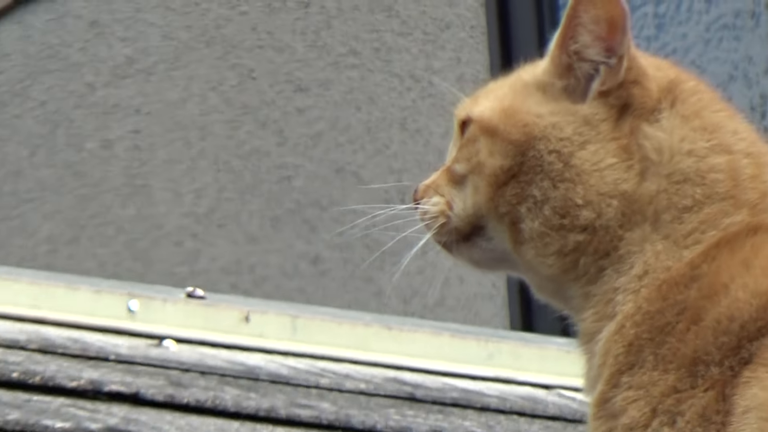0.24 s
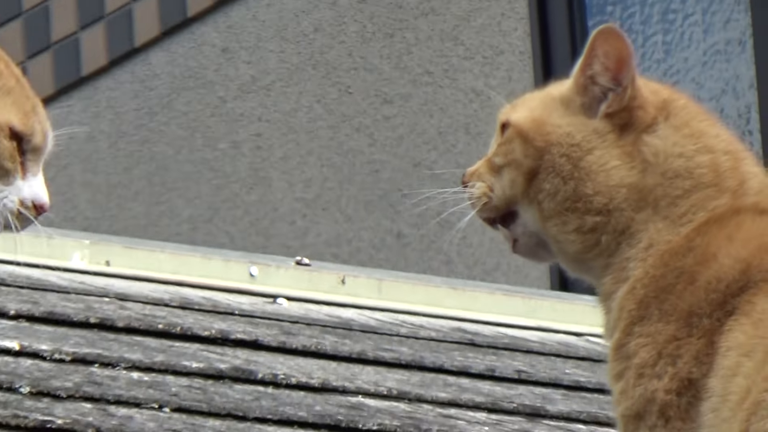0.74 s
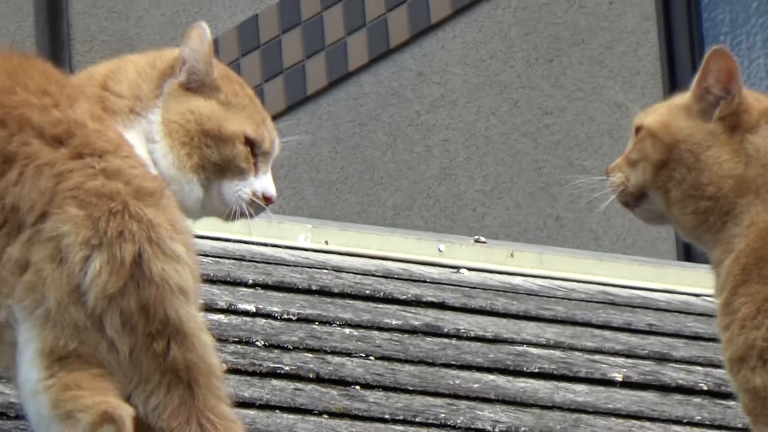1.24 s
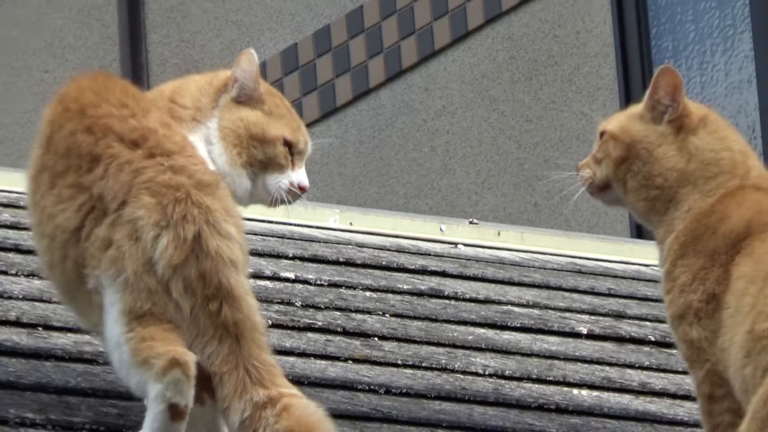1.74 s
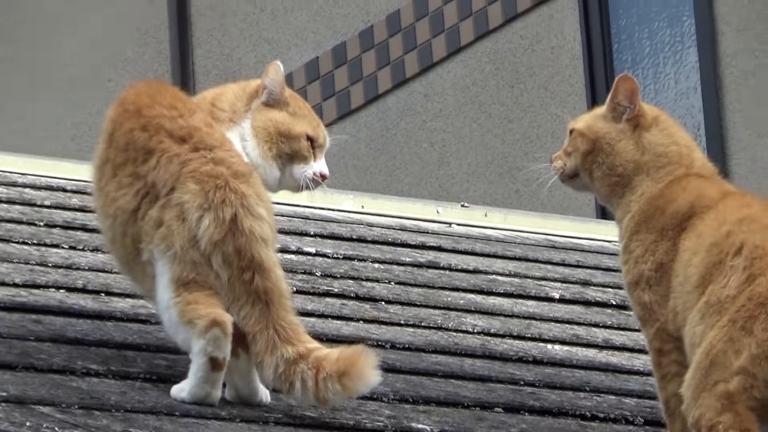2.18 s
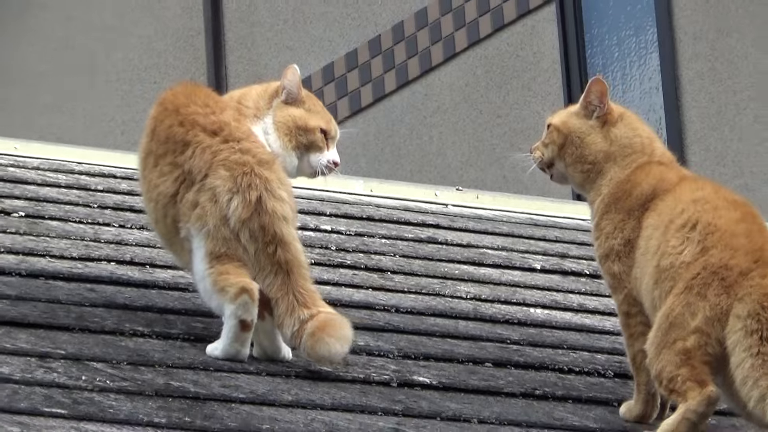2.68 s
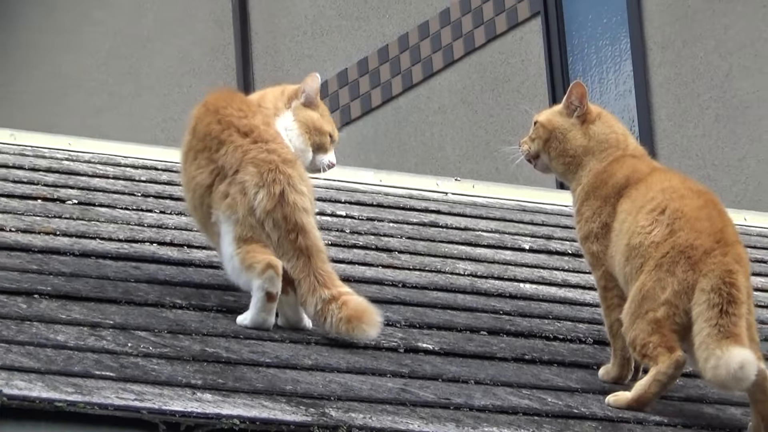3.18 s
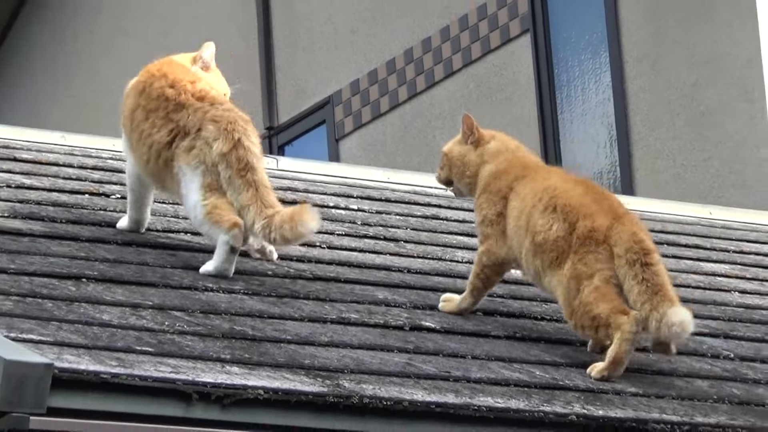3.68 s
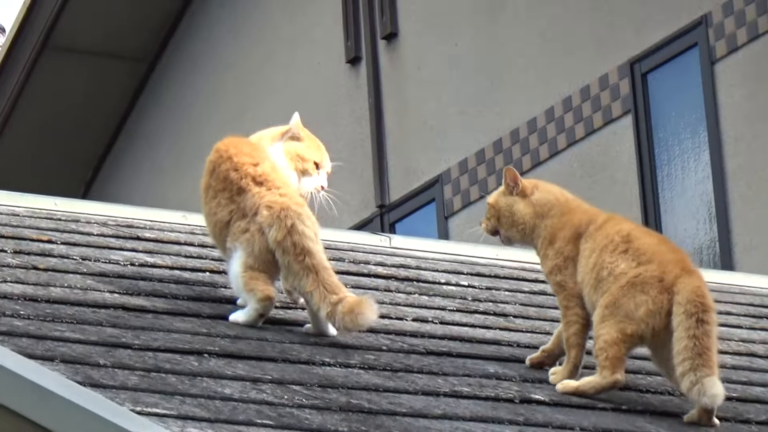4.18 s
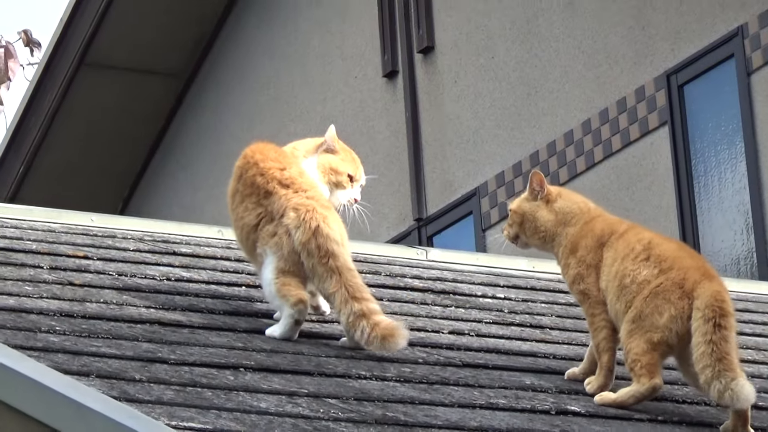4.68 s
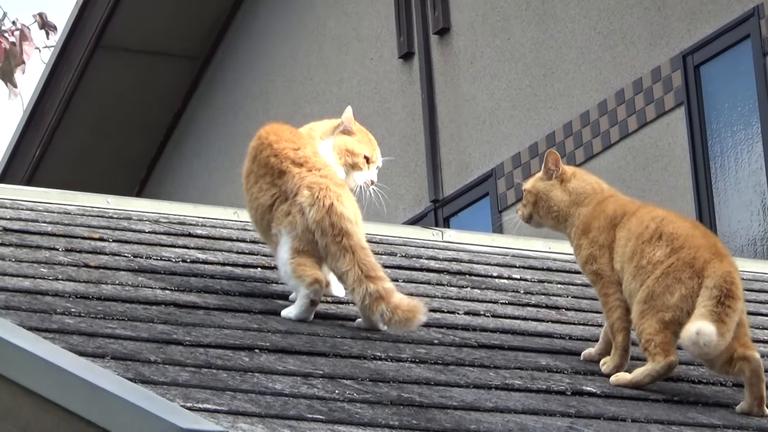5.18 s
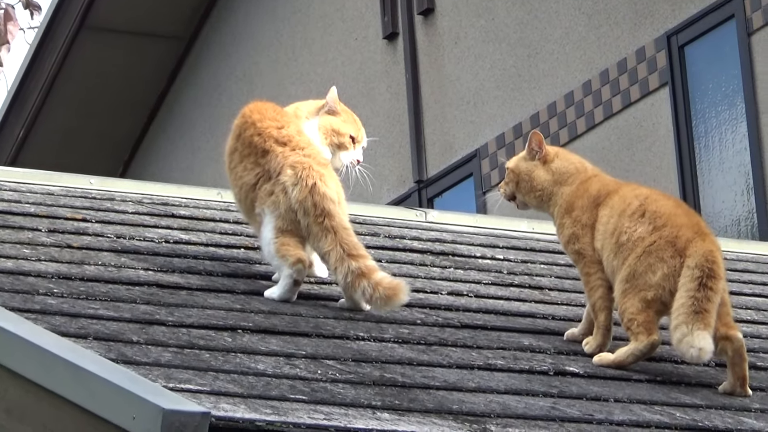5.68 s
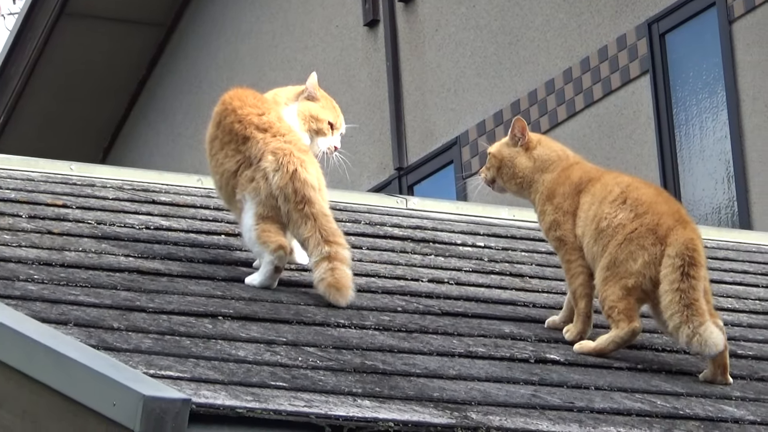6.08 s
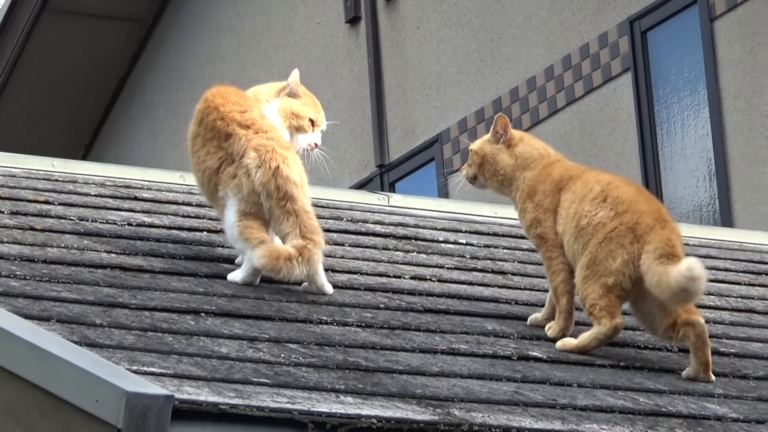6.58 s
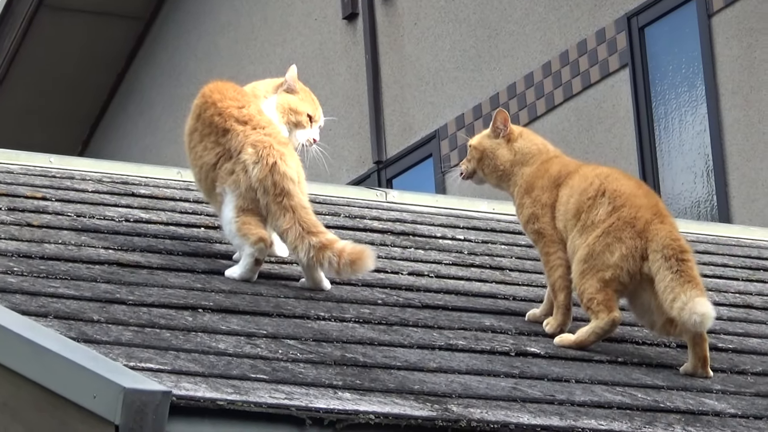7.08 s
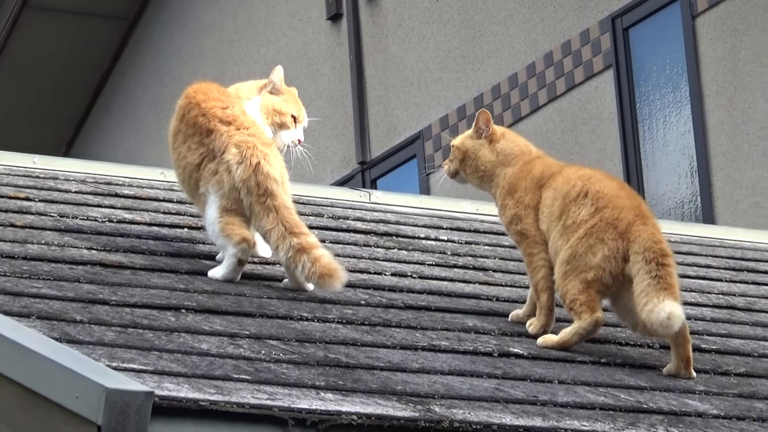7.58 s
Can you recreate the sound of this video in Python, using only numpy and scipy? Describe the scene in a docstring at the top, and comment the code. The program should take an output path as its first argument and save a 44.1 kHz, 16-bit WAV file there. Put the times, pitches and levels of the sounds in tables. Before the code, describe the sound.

Two tomcats face off on a roof beside a house wall, with soft outdoor air and distant traffic rumble throughout. A very thin, high camera motor whine runs until about 3.5 seconds, and a close click with light scuffs comes at 0.1. From 0.6 to 1.4 a nasal, ringing yowl arches up and sinks, leaving a faint falling moan near 1.5. A short double hooting bark, likely a dog's, echoes at 2.1. A shorter yowl fills 2.8 to 3.3, followed by small clicks and one bark at 3.7. The longest yowl scoops up sharply at 3.7 and slowly falls, hoarse at its edges, until 4.8. Traffic and air swell around 5. The last yowl, 5.7 to 6.7, breaks upward into a thinner tone, with a soft mouth click after it. More barks come at 7.1 and in a quick cluster from 7.5, mostly right. Walls return short echoes.

```python
"""A roof beside a house wall: distant traffic and outdoor air are shaped noise that swells, most from about 5 s.
A camera's zoom motor whines faintly until 3.55 s, a wavering sine; noise bursts on resonances click close by.
From 0.6 s two tomcats face off in four arching, nasal yowls, harmonic stacks thrown back by the walls.
From 2.1 s short hooting barks, likely a dog's, come from a nearby yard: arched tones with gruff noise and echo."""
import sys
import numpy as np
from scipy import signal
from scipy.fft import rfft, irfft, next_fast_len
from scipy.io import wavfile

SR = 44100
rng = np.random.default_rng(int(sys.argv[2]) if len(sys.argv) > 2 else 0)


def waveform_to_disk(signal):
    """Save audio, clipped to [-1, 1], as 16-bit WAV at the path in sys.argv[1]."""
    frames = np.transpose(np.atleast_2d(signal))
    scaled = np.clip(frames, -1, 1) * 32767
    samples = np.round(scaled).astype(np.int16)
    wavfile.write(sys.argv[1], SR, samples)


N = 345744
T = np.arange(N) / SR  # s

# outdoor air, spectrum: [f/Hz, level/dB]
AIR_COLOUR = [(15, -43), (25, -14.5), (87, -11.5), (117, 0.5), (166, -6), (200, -23.5), (235, -0.5),
              (502, -12.5), (694, -11), (1070, -14.5), (1830, -25.5), (3700, -29.5), (12500, -38.5),
              (13900, -47), (15900, -40)]
# background swells: [t/s, middle level/dB, hiss level/dB], both over the air
BACKGROUND_SWELL = [(0, 1.5, 2.5), (1.8, 2, 2.5), (3.5, 2, 4), (4.9, 5, 7.5), (5.25, 10, 6.5), (5.55, 5, 7),
                    (6.9, 6.5, 6), (7.84, 4.5, 5)]
# far engines and tyres, spectra: [f/Hz, level/dB]
ENGINE_COLOUR = [(40, -25), (80, -2.5), (120, -0.5), (145, 0.5), (174, 5.5), (200, -4), (260, -18),
                 (500, -59.5)]
TYRE_COLOUR = [(150, -22.5), (205, -5.5), (240, 3), (285, -5.5), (350, -10), (550, -23.5), (1200, -46.5)]
# traffic swells: [t/s of the peak, half length/s, engine level/dB, tyre level/dB]
TRAFFIC_SWELLS = [(4.9, 0.44, -54, -53.5), (6.05, 0.17, -69, -54.5), (6.75, 0.78, -50.5, -60),
                  (7.47, 0.31, -47.5, -54.5), (7.83, 0.14, -64, -50)]
# zoom motor whine: [f/Hz, level/dB]
ZOOM_WHINE = [(13706, -87)]
# clicks and short scuffs; the two near 6.75 s are likely the cat's mouth closing:
# [t/s, peak level/dB, decay/s, treble tilt/(dB per octave)]
CLICKS = [(0.125, -31.5, 0.028, 14), (0.1322, -16, 0.0036, -2), (.146, -32, 0.0027, -6),
          (.16, -35, 0.017, -11.5), (3.282, -39, 0.034, -2), (3.298, -40, 0.019, 11),
          (3.4698, -45, 0.015, 8), (3.5327, -34, 0.0037, 5), (3.675, -30.5, 0.0073, -6),
          (6.748, -35, 0.019, -15), (6.795, -45, 0.017, 16), (7.6239, -47, 0.0037, 21)]
# what the clicks ring with: [f/Hz, width/Hz, level/dB]
CLICK_MODES = [(780, 400, -8), (1320, 410, 1), (1990, 210, 1), (3590, 81, 1), (5060, 180, -10),
               (7250, 240, -25)]
# noise of the clicks, spectrum: [f/Hz, level/dB]
CLICK_COLOUR = [(250, -21), (620, -15.5), (850, -3), (1330, 3), (1750, -10), (2150, -2.5), (3300, -7),
                (4300, -11), (5050, -11.5), (6000, -20.5), (9400, -22), (15500, -56)]

# pitch arch of each yowl; the fourth breaks upward into a thinner register: [t/s, f/Hz]
PITCH_1 = [(.645, 577), (.675, 619), (.729, 654.4), (.809, 674.2), (.971, 684.4), (1.155, 685.2),
           (1.225, 667.4), (1.287, 627.8), (1.4, 602)]
PITCH_2 = [(2.772, 670), (2.87, 699), (2.95, 695.7), (3.01, 689.2), (3.12, 683.8), (3.185, 676),
           (3.28, 636)]
PITCH_3 = [(3.68, 377), (3.732, 599), (3.764, 679), (3.815, 744), (3.874, 768.4), (4.0, 780.5),
           (4.22, 761.6), (4.42, 711.3), (4.62, 685.8), (4.716, 651.3), (4.8, 582)]
PITCH_4 = [(5.66, 588.4), (5.732, 633.4), (5.79, 651.6), (5.92, 657.8), (6.01, 643.1), (6.03, 653)]
PITCH_4_BREAK = [(6.045, 664), (6.09, 675), (6.25, 666.7), (6.42, 649.5), (6.53, 625.8), (6.645, 586),
                 (6.7, 612.3), (6.74, 591.5)]
# how each is pushed out: [t/s, effort level/dB, mouth opening/0-1, nasal level at 3-5 kHz/dB,
# level of the overtones above it/dB]
EFFORT_1 = [(.645, -38, 0.35, -71, -72), (0.738, -28.5, 0.29, -53.5, -57.5), (.9, -30, 0.31, -43, -49.5),
            (1.03, -28, 0.39, -46.5, -51.5), (1.14, -31.5, 0.34, -54, -52.5), (1.27, -27, 0.19, -56, -59.5),
            (1.399, -44.5, 0.24, -67, -76)]
EFFORT_2 = [(2.77, -35.5, .27, -60, -74), (2.87, -32, 0.29, -56, -62.5), (3.07, -29, 0.27, -54.5, -57.5),
            (3.19, -29, 0.22, -56.5, -53.5), (3.28, -34.5, 0.2, -56, -63.5)]
EFFORT_3 = [(3.68, -39, 0.66, -63, -66), (3.733, -21.5, 0.64, -54, -53), (3.84, -23, 0.59, -47, -50.5),
            (3.97, -24.5, 0.55, -44, -45), (4.1, -25.5, 0.47, -39.5, -47.5), (4.18, -26.5, .44, -44, -44),
            (4.24, -21.5, 0.48, -41, -46.5), (4.45, -24, 0.33, -48, -45.5), (4.62, -22, 0.27, -50, -48),
            (4.78, -22, 0.25, -58, -49.5), (4.83, -40.5, 0.26, -66, -66)]
EFFORT_4 = [(5.66, -30.5, 0.44, -74, -72), (5.71, -24, 0.43, -59, -58.5), (5.9, -19.5, 0.25, -50, -49.5),
            (6.03, -16.5, 0.11, -52, -50.5)]
EFFORT_4_BREAK = [(6.045, -28, .02, -63, -55.5), (6.2, -29.5, .02, -60.5, -55.5),
                  (6.299, -24.5, 0.032, -56, -57.5), (6.35, -23, .06, -58.5, -59),
                  (6.5, -27.5, .12, -48, -61), (6.59, -20, 0.14, -56, -56), (6.66, -27, 0.23, -57, -57.5),
                  (6.74, -36, 0.15, -64, -78)]
# throat colour above the fourth harmonic: [f/Hz, level/dB]
THROAT_1 = [(2900, -18), (3400, -7.5), (4120, 0.5), (4800, -8), (5500, -7.5), (6200, -5), (6850, -20),
            (7500, -13), (8200, -8), (8900, -1.5), (9600, -11.5), (11000, -28), (12400, -15), (14500, -40)]
THROAT_2 = [(1880, -25), (3200, -29), (3510, 11), (3760, -16), (4150, 4), (4840, 2), (5120, -14), (5510, 3),
            (5790, -31), (6120, -8), (9670, 0), (10900, -60), (14000, -32)]
THROAT_3 = [(1800, -1), (2300, 3), (2800, 13.5), (3200, -2), (3900, -16.5), (4300, 0), (4680, -0.5),
            (5100, -9), (5450, -3.5), (6200, -1.5), (7000, -2.5), (8400, -5), (9400, -4.5), (10100, -12),
            (11000, -7), (12600, -17), (15000, -31)]
THROAT_4 = [(2900, -9), (3300, 2.5), (3950, 3.5), (4600, -4), (5250, -10), (6000, -8.5), (7200, -1.5),
            (8000, 1.5), (9200, -7), (10500, -11), (12000, -14), (14000, -36)]
THROAT_4_BREAK = [(3400, -9.5), (4050, -13), (4500, 6), (4750, -4), (5400, -10.5), (6100, -11), (6800, -8),
                  (7400, -2.5), (8100, -13), (10000, -12), (12000, -45), (14000, -32)]
# one row for each yowl and register: [attack/s, release/s, fundamental level at the usual pitch/dB,
# centre of the ring lifting the fourth harmonic f/Hz, ring level over the overtones/dB,
# hoarseness throughout/0-1, extra hoarseness at the start, extra at the end]
VOICES = [(.015, 0.016, -46, 2846, 19, 0.054, 0.031, .08),
          (0.0022, 0.0076, -45.5, 2570, 14.9, 0.069, .02, .16),
          (.022, 0.045, -38.5, 2734, 15.6, 0.047, 0.36, 0.17),
          (0.012, 0.01, -40, 2780, 14.7, 0.019, 0.031, .02),
          (.012, 0.0046, -40.5, 2330, 16.3, 0.034, .04, 0.065)]
# wall echoes: [delay t/s, left level/dB, right level/dB]
WALLS = [(.0113, -26.5, -19.5), (.029, -25, -36.5), (.056, -15, -15), (.088, -17, -32.5)]
# barks, each in one to four pushes: [t/s, length/s, pitch f/Hz, level/dB, roughness/0-1, left minus right/dB]
BARKS = [(2.095, 0.083, 877.4, -29, 0.35, -4.5), (2.156, 0.059, 862.4, -27.5, 0.35, -1),
         (3.697, 0.065, 879, -22, 0, -5), (7.13, 0.064, 866.6, -29, 0.24, -4.5),
         (7.167, 0.0625, 880.3, -20.5, 0.16, -5.5), (7.456, 0.039, 765, -35.5, 0.44, 2),
         (7.5, 0.0565, 825.6, -25, 0.31, -5), (7.562, 0.028, 827, -29.5, 0.36, -4),
         (7.61, 0.04, 863, -30, 0, -1)]

AIR_DB, ENGINES_DB, TYRES_DB = -52.5, -58.5, -60.5  # air before its bands are split; steady traffic
# the fundamental carries better as the pitch rises above its usual value
USUAL_HZ, FUNDAMENTAL_DB_PER_OCTAVE = 649, 26
MOUTH_WIDTH = 0.16  # half width of the mouth resonance, as a share of the pitch
RING_WIDTH_HZ = 620
HOARSE_START_S, HOARSE_END_S = 0.16, 0.056
MOUTH_AIR_DB = -32.5  # turbulence in the half-open mouth, against the effort
HOARSE_AIR_DB = 19  # extra turbulence at hoarseness 1
TOP_HZ = 15800


def undb(db):
    """Decibels to gain."""
    return 10 ** (np.asarray(db) / 20)


def unit(x):
    """Scale to rms 1."""
    return x / np.sqrt(np.mean(x ** 2) + 1e-20)


def curves(table, t):
    """The columns of a table at times t."""
    s, *columns = np.transpose(table)
    return [np.interp(t, s, c) for c in columns]


def gain_at(points, hz):
    """Gain of an [f/Hz, level/dB] spectrum, read on a log frequency scale."""
    f, db = np.transpose(points)
    return undb(np.interp(np.log(hz + 1e-3), np.log(f), db))


def colour(x, points):
    """Filter by an [f/Hz, level/dB] spectrum."""
    size = x.shape[-1]
    padded = next_fast_len(size)
    gain = gain_at(points, np.fft.rfftfreq(padded, 1 / SR))
    return irfft(rfft(x, padded) * gain, padded)[..., :size]


def band(x, hz, width_hz):
    """One resonance, gain 1 at its centre."""
    b, a = signal.iirpeak(min(hz, .45 * SR), hz / width_hz, fs=SR)
    return signal.lfilter(b, a, x)


def wander(t, rate):
    """Random drift with about `rate` turns a second, spread near 1."""
    steps = (t - t[0]) * rate
    return 1.425 * np.interp(steps, np.arange(8192), rng.standard_normal(8192))


def reverb(x, t60, damp_hz, build_s):
    """Diffuse stereo tail between the houses; it builds up, then dies, treble first."""
    t = T[:SR]
    mid, side = rng.standard_normal((2, SR))
    tail = (mid + .5 * np.array([side, -side])) * (1 - np.exp(-t / build_s))
    lowpass = signal.butter(2, min(damp_hz, .45 * SR), fs=SR, output="sos")
    dull = signal.sosfilt(lowpass, tail)
    fade = np.exp(-np.log(1000) * t / t60)
    response = dull * fade + 0.13 * tail * fade ** 2
    return signal.fftconvolve(x[None], unit(response) / np.sqrt(SR), axes=1)[:, :N]


def add(track, start_s, sound):
    """Mix a sound in at its time."""
    i = max(int(start_s * SR), 0)
    track[..., i:i + sound.shape[-1]] += sound[..., :N - i]


def traffic_gains():
    """Gains of engines and tyres: the steady rumble and its bell-shaped swells add in power."""
    power = undb([[ENGINES_DB], [TYRES_DB]]) ** 2
    for s, half_s, engine_db, tyre_db in TRAFFIC_SWELLS:
        bell = np.exp(-((T - s) / half_s) ** 2)
        power = power + undb([[engine_db], [tyre_db]]) ** 2 * bell
    return np.sqrt(power)


def outdoors():
    """Outdoor air and distant traffic as shaped noise, nearly alike left and right, rising in swells."""
    middle_db, hiss_db = curves(BACKGROUND_SWELL, T)
    engine_gain, tyre_gain = traffic_gains()
    mid, side, engine, road = rng.standard_normal((4, N))
    side = colour(side, [(100, -40.5), (300, -18.5), (1200, -6), (4000, -5.0), (12000, -16.0)])
    spread = np.array([side, -side])
    air = undb(AIR_DB) * unit(colour(mid + spread, AIR_COLOUR))
    middle = colour(air, [(200, -16), (450, -2.5), (750, -3.5), (1250, -0.5), (1900, -4.5),
                          (3000, -6), (6000, -39.0)])
    hiss = colour(air, [(1000, -23), (1900, -3.0), (3000, -2.0), (6000, 3.5)])
    bass = colour(air, [(45, 1.0), (120, -34), (300, -35)])
    middle = middle * undb(middle_db + 1.13 * wander(T, 7.7))
    hiss = hiss * undb(hiss_db)
    engines = unit(colour(engine + spread, ENGINE_COLOUR)) * engine_gain
    tyres = unit(colour(road + spread, TYRE_COLOUR)) * tyre_gain
    return bass + middle + hiss + engines + tyres


def zoom_motor(stop_s=3.55):
    """A thin whine while the lens pulls back: one sine, slightly unsteady in pitch."""
    hz, db = ZOOM_WHINE[0]
    phase = 2 * np.pi * np.cumsum(hz + 25 * wander(T, 120)) / SR
    running = np.clip((stop_s - T) / 0.055, 0, 1)
    return np.sqrt(2) * undb(db) * np.sin(phase) * running


def clicks(rise=0.1):
    """Small clicks and short scuffs, noise bursts with a short echo; longer ones start more softly."""
    dry, t = np.zeros(N), T[:4096]
    lead = 128  # samples of silence ahead of each push
    for s, db, decay, tilt_db in CLICKS:
        envelope = np.exp(-t / decay) * (1 - np.exp(-t / (rise * decay)))
        push = np.pad(rng.standard_normal(len(t)) * envelope, (lead, 0))
        ring = sum(undb(mode_db) * band(push, hz, width) for hz, width, mode_db in CLICK_MODES)
        sound = unit(colour(push, CLICK_COLOUR)) + .5 * unit(ring)
        sound = colour(sound, [(500, 0), (8000, 4 * tilt_db)])  # four octaves of tilt
        sound = colour(sound, [(9500, -4), (12500, -8), (15500, -20)])
        add(dry, s - lead / SR, undb(db) * sound / np.abs(sound).max())
    return dry + undb(-11) * reverb(dry, t60=0.44, damp_hz=5400, build_s=0.0014)


def hoarseness(t, start, end, at_start, at_end):
    """The folds run unevenly while they get going and again as the air runs out."""
    getting_going = at_start * np.exp(-((t - start) / HOARSE_START_S) ** 2)
    running_out = at_end * np.exp(-(np.minimum(t - end, 0) / HOARSE_END_S) ** 2)
    return getting_going + running_out


def low_harmonics(hz, effort_db, opening, fundamental_db, ring_hz, ring_db):
    """Gains of harmonics 1-4; opening the mouth lifts its resonance from the second to the third."""
    first = undb(fundamental_db + FUNDAMENTAL_DB_PER_OCTAVE * np.log2(hz / USUAL_HZ))
    mouth = 1 / (1 + (np.array([opening, 1 - opening]) / MOUTH_WIDTH) ** 2)
    second, third = undb(effort_db) * mouth / np.hypot(*mouth)
    fourth = undb(ring_db) / (1 + (2 * (4 * hz - ring_hz) / RING_WIDTH_HZ) ** 2)
    return first, second, third, fourth


def yowl(pitch, effort, throat, manner, jitter=0.00157, rasp_jitter=0.025, shimmer=0.19, air_db=-9.0,
         waver_db=3.0, flutter_db=2.0, low_waver_db=1.14, pull=0.38):
    """Vocal folds give a clean harmonic stack; when hoarse, their cycles turn uneven and leak air."""
    attack_s, release_s, fundamental_db, ring_hz, ring_db, hoarse, hoarse_start, hoarse_end = manner
    start, end = effort[0][0], effort[-1][0]
    t = np.arange(int((start - attack_s / 2) * SR), int((end + 4 * release_s) * SR)) / SR
    hz, = curves(pitch, t)
    effort_db, opening, nasal_db, top_db = curves(effort, t)
    rasp = hoarse + hoarseness(t, start, end, hoarse_start, hoarse_end)
    low = low_harmonics(hz, effort_db, opening, fundamental_db, ring_hz, top_db + ring_db)
    # the throat's resonances sink with the pitch
    stretch = np.clip(hz / hz.max(), .85, 1) ** pull
    hz = hz * (1 + jitter * wander(t, 54.83) + rasp_jitter * rasp * wander(t, 500))
    phase = 2 * np.pi * np.cumsum(hz) / SR
    voice = np.zeros(len(t))
    for k, gain in enumerate(low, 1):
        voice += gain * undb(low_waver_db * wander(t, 22.44)) * np.sin(k * phase)

    # overtones slide through the throat's resonances, and each wavers on its own as reflections interfere
    orders = np.arange(5, 24)[:, None]
    overtone_hz = orders * hz
    wavers_db = np.array([waver_db * wander(t, 8.74) + flutter_db * wander(t, 69.8) for _ in orders])
    weights = gain_at(throat, overtone_hz / stretch) * undb(wavers_db)
    upper = np.clip((overtone_hz - 5000) / 500, 0, 1)
    counted = np.clip((overtone_hz - 2800) / 400, 0, 1)  # overtones that set the band's level
    for share, db in ((1 - upper, nasal_db), (upper, top_db)):
        part = weights * share
        power = (part ** 2 * counted).sum(0)
        voice = voice + undb(db) * (part * np.sin(orders * phase)).sum(0) / np.sqrt(power)
    voice *= np.sqrt(2) * (1 + shimmer * rasp * wander(t, 700))

    # turbulence, pulsed once a cycle, rings the same throat
    air = unit(colour(rng.standard_normal(len(t)), throat))
    air = air * (1 + np.cos(phase)) * undb(HOARSE_AIR_DB * rasp)
    mouth_air = unit(band(band(air, 1700.0, 1300.), 1700.0, 1300.))
    voice += undb(top_db + air_db) * air
    voice += undb(effort_db + MOUTH_AIR_DB) * 2 * opening * mouth_air
    gate = np.clip((t - t[0]) / attack_s, 0, 1) * np.exp(-np.maximum(t - end, 0) / release_s)
    track = np.zeros(N)
    add(track, t[0], voice * gate)
    return track


def moan(start_s=1.45, length_s=0.15, from_hz=590, to_hz=405, db=-52, octave_db=-14):
    """The first yowl trails off in a faint falling moan: a gliding tone and its octave."""
    t = T[:int(length_s * SR)]
    progress = t / length_s
    hz = from_hz * (to_hz / from_hz) ** progress * (1 + .012 * wander(t, 89))
    phase = 2 * np.pi * np.cumsum(hz) / SR
    tone = np.sin(phase) + undb(octave_db) * np.sin(2 * phase)
    track = np.zeros(N)
    add(track, start_s, undb(db) * tone * np.sqrt(np.sin(np.pi * progress)))
    return track


def cats():
    """Four yowls on the roof, reaching the microphone directly, off the walls and through the street."""
    calls = [(PITCH_1, EFFORT_1, THROAT_1), (PITCH_2, EFFORT_2, THROAT_2), (PITCH_3, EFFORT_3, THROAT_3),
             (PITCH_4, EFFORT_4, THROAT_4), (PITCH_4_BREAK, EFFORT_4_BREAK, THROAT_4_BREAK)]
    dry = sum(yowl(*call, manner) for call, manner in zip(calls, VOICES)) + moan()
    out = dry + undb(-15.0) * reverb(dry, t60=0.44, damp_hz=4700, build_s=0.004)
    for delay, *sides_db in WALLS:
        add(out, delay, undb(sides_db)[:, None] * dry)
    # the roof throws the bright partials back from one side, which widens them
    glance = colour(dry, [(700, -29), (1400, -27), (2200, -19.5), (3000, -11), (5000, -18.5), (10000, -22)])
    add(out, .0032, np.array([glance, -glance]))
    return out


def bark(length, hz, rough, arch=0.028, octave_db=-35):
    """A short hoot: an arched, unsteady tone on the throat resonance, and the gruff noise that goes with it."""
    t = T[:int(length * SR)]
    progress = t / length
    pitch = hz * (1 + arch * (np.sin(np.pi * progress) - .75) + 0.061 * rough * wander(t, 266))
    phase = 2 * np.pi * np.cumsum(pitch) / SR
    tone = np.sin(phase) + undb(octave_db) * np.sin(2 * phase)
    tone = tone * (1 + 0.74 * rough * wander(t, 149.6))
    gruff = colour(rng.standard_normal(len(t)), [(300, -23), (750, 3.5), (1100, 4), (1600, -4.0),
                                                 (2050, -5.5), (2900, -21), (6000, -42)])
    swell = np.abs(np.sin(np.pi * progress ** 1.47)) ** 0.62
    return unit(tone) * swell, unit(gruff) * swell


def dog(gruff_direct_db=-25, gruff_echo_db=-15.0):
    """Barks from a nearby yard, mostly to the right; the gruff part arrives mostly by way of the walls."""
    direct, source = np.zeros((2, N)), np.zeros(N)
    for s, length, hz, db, rough, pan_db in BARKS:
        tone, gruff = bark(length, hz, rough)
        sides_db = db + np.array([[pan_db], [-pan_db]]) / 2
        add(direct, s, undb(sides_db) * (tone + undb(gruff_direct_db) * gruff))
        add(source, s, undb(db) * (tone + undb(gruff_echo_db) * gruff))
    # the echo flutters coarsely
    source *= 0.67 + 0.75 * wander(T, 200)
    return direct + undb([[-13], [-10]]) * reverb(source, t60=0.65, damp_hz=2800, build_s=0.017)


def scene():
    """Everything on and around the roof."""
    return outdoors() + zoom_motor() + clicks() + cats() + dog()


def record(dry):
    """The camera cuts the top with a steep low-pass."""
    lowpass = signal.ellip(10, .2, 80, TOP_HZ, fs=SR, output="sos")
    return signal.sosfilt(lowpass, dry)


dry = scene()
out = record(dry)
waveform_to_disk(out)
```